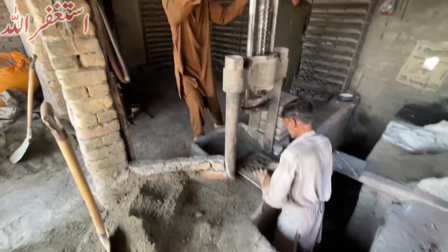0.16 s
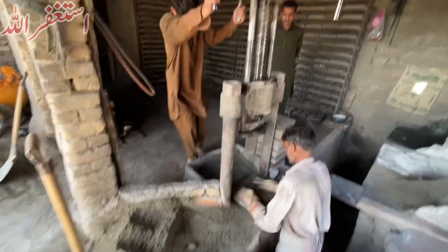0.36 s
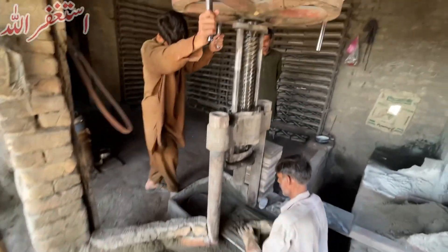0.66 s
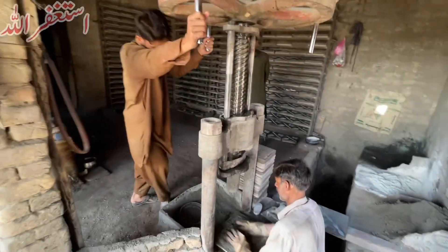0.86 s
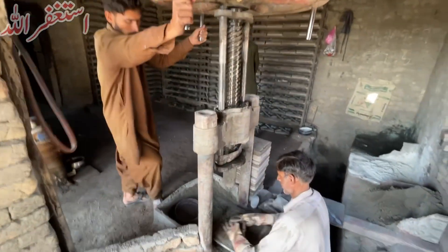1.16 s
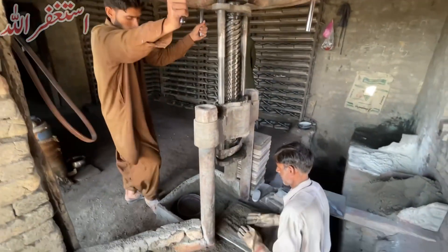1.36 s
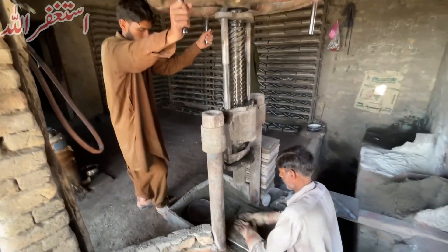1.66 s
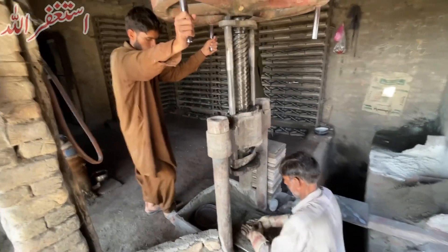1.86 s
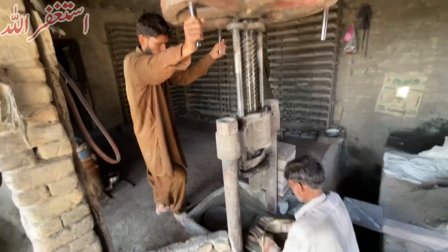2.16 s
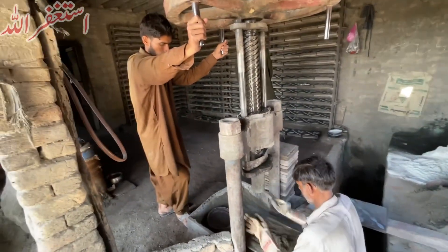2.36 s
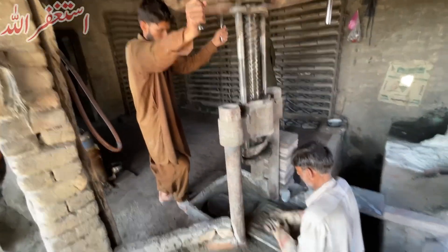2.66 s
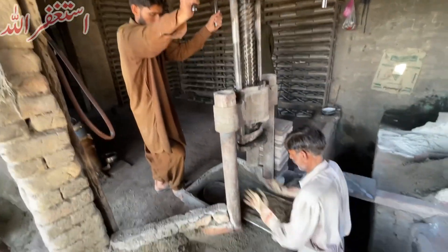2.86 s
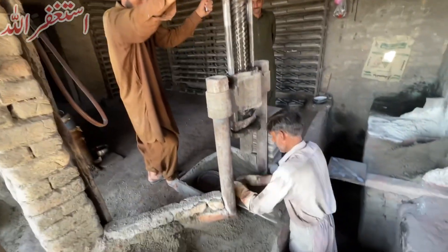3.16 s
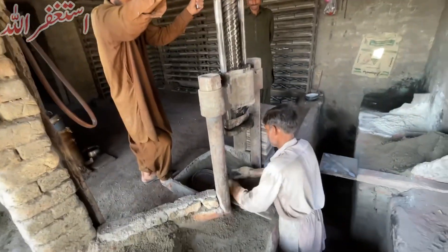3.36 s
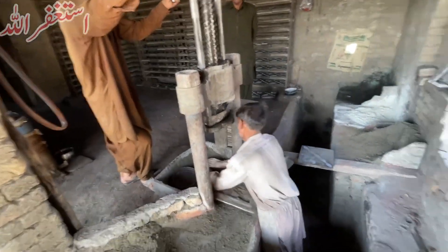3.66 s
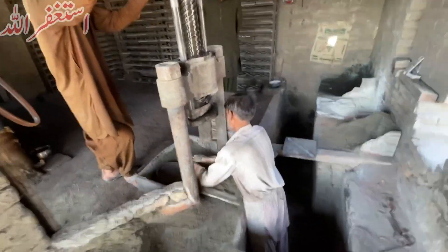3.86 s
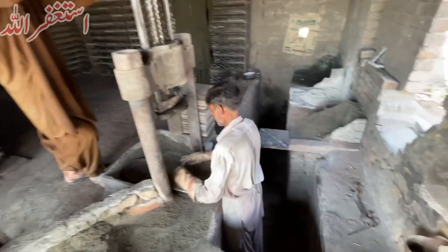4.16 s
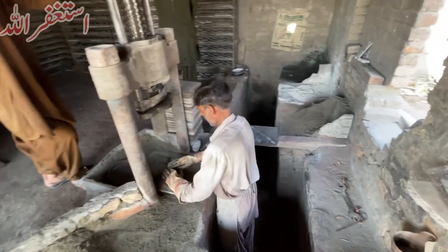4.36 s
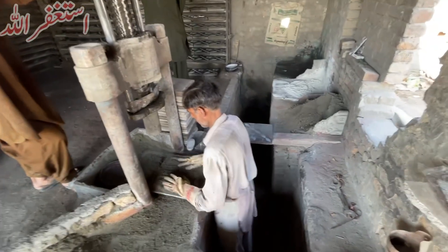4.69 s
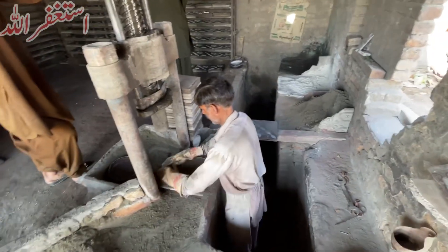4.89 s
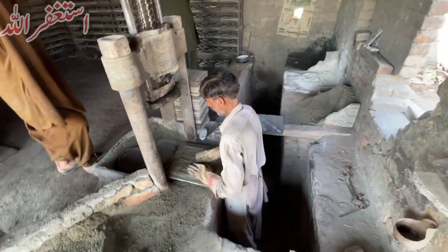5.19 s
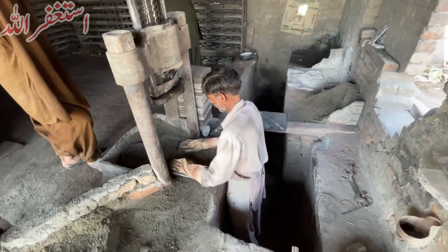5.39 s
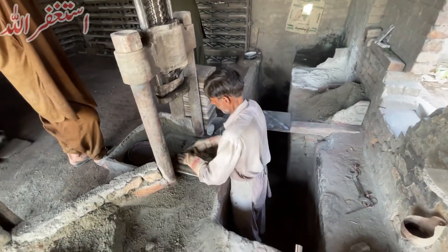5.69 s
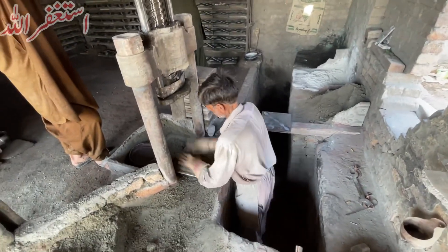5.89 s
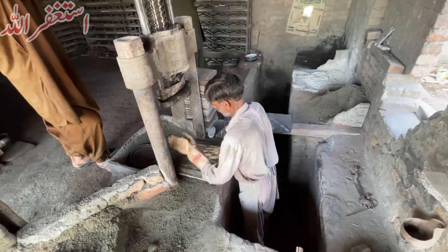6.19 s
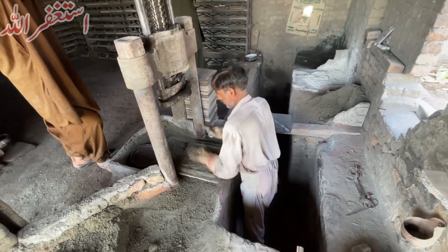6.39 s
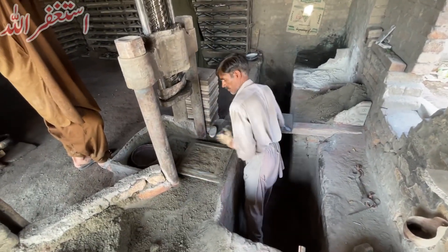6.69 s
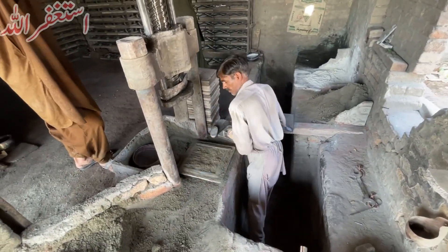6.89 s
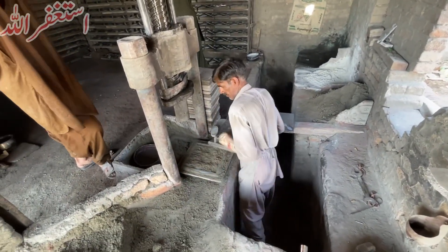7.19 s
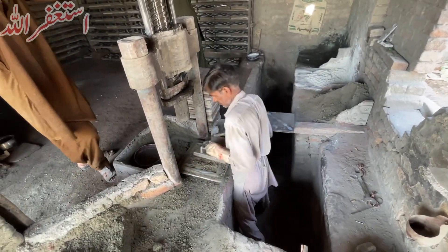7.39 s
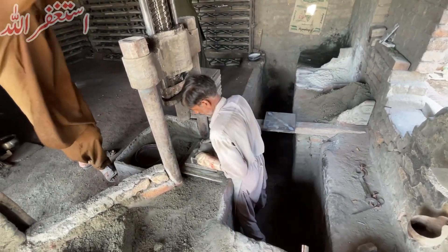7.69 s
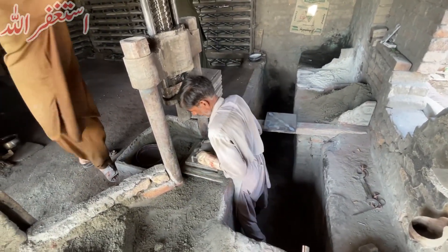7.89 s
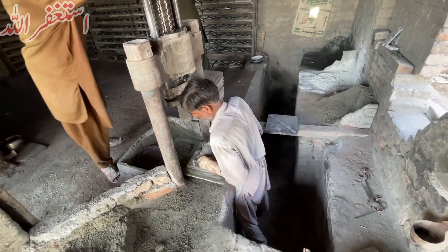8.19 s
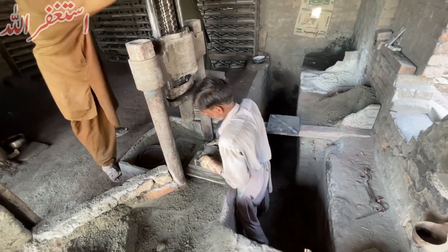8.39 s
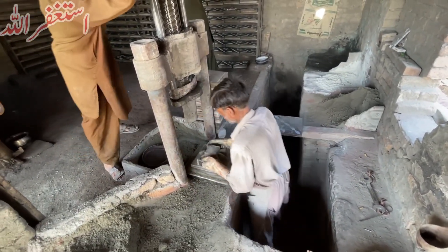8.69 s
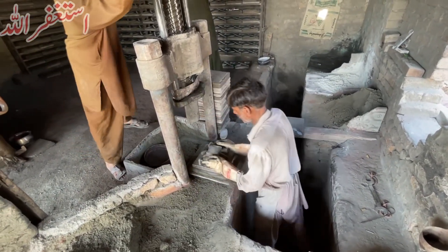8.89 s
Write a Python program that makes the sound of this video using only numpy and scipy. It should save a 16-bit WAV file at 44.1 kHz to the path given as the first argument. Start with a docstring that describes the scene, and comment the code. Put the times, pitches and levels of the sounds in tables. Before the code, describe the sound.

Steel mould knocks and scrapes over gritty cement on a press bed, then a loud clashing metal slam rings, and a last knock cuts off.

```python
"""Mould knocked about on a screw press

A tile maker knocks a steel mould about on the bed of a hand screw press in a small brick workshop.
Knocks are noise bursts and damped modes; between them the mould rubs over gritty cement (shaped noise).
Then it is shoved home and the press slams, rattles and rings: clashing steel over the frame's modes.
Rough bursts, brief tones, rumble and hiss fill in; a last knock follows before the sound stops dead."""
import sys
import numpy as np
from scipy import signal
from scipy.fft import rfft, irfft, next_fast_len
from scipy.io import wavfile
from scipy.ndimage import uniform_filter1d, map_coordinates

SR = 44100
rng = np.random.default_rng(int(sys.argv[2]) if len(sys.argv) > 2 else 0)


def wav_out(sig):
    """Save sig, one row per channel (or a flat mono array), as 16-bit PCM at SR to the path in sys.argv[1]."""
    wavfile.write(sys.argv[1], SR, np.round(np.clip(np.atleast_2d(sig).T, -1, 1) * 32767).astype(np.int16))


N = 399105

# spectrum of steel contact: (frequency [Hz], density [dB per Hz])
CLASH_COLOUR = [(88, -36), (150, 0), (534, -5), (821, -3), (1080, -4), (2450, -1.5), (2700, -2.5),
                (3290, -4.5), (4320, -9), (7180, -17), (9260, -21), (10400, -25.5), (16000, -34)]
# spectrum of low rumbling: (frequency [Hz], density [dB per Hz])
RUMBLE_COLOUR = [(20, -35.5), (40, -18.5), (70, -5.5), (100, -4), (125, 5.5), (155, -5), (195, -0.5),
                 (260, -9.5), (400, -15), (700, -20.5), (1500, -48.5)]
FLAT = [(100, 0)]


def amp(db):
    """Decibels to gain."""
    return 10 ** (np.asarray(db) / 20)


def unit(x):
    """Scale to rms 1."""
    return x / np.sqrt(np.mean(x ** 2) + 1e-20)


def along(points, hz):
    """Interpolate (frequency [Hz], value) points on a log-frequency axis."""
    f, v = np.transpose(points)
    return np.interp(np.log(hz + 1), np.log(f + 1), v)


def curves(rows):
    """One value per sample for each column after the time."""
    s, *cols = np.transpose(rows)
    return [np.interp(np.arange(N) / SR, s, c) for c in cols]


def wobble(knots_per_s):
    """Smooth random curve through normally distributed knots."""
    knots = rng.standard_normal(int(N * knots_per_s / SR) + 4)
    return map_coordinates(knots, [np.arange(N) * knots_per_s / SR])


def filtered(x, response):
    """Multiply the spectrum of x by a response of frequency."""
    size = x.shape[-1]
    m = next_fast_len(size + 2048)
    return irfft(rfft(x, m) * response(np.fft.rfftfreq(m, 1 / SR)), m)[..., :size]


def noise(colour, size, lo_hz=0, hi_hz=SR):
    """Coloured stereo noise of rms 1, alike in the bass and largely unrelated in the treble."""
    # left-right likeness: (frequency [Hz], correlation [0-1])
    alike = [(100, 0.94), (250, 0.85), (600, 0.22), (2000, 0.26), (5000, 0.22), (12000, .1)]

    def mid_side(hz):
        turn = np.arccos(np.clip(along(alike, hz), -1, 1)) / 2
        gain = amp(along(colour, hz)) * (hz >= lo_hz) * (hz < hi_hz)
        return gain * np.array([np.cos(turn), np.sin(turn)])

    mid, side = filtered(rng.standard_normal((2, size)), mid_side)
    return unit(np.array([mid + side, mid - side]))


def add(track, s, sound):
    """Mix a sound in at time s."""
    start = max(round(s * SR), 0)
    track[:, start:start + sound.shape[-1]] += sound[..., :N - start]


def burst(colour, band_hz, rise_s, t60_s):
    """Dense, fast-dying modes within one band, as decaying noise at rms 1 over the first 20 ms."""
    t = np.arange(SR // 2) / SR
    envelope = (1 - np.exp(-(t / rise_s) ** 2)) * amp(-60 * t / t60_s)
    x = noise(colour, len(t), *band_hz) * envelope
    return x / np.sqrt(np.mean(x[:, :SR // 50] ** 2))


def ring(modes, rise_s, scatter_db, spread_rad):
    """Decaying modes at randomly scattered strengths; spread sets their phase difference between ports."""
    hz, db, t60 = np.transpose(modes)
    t = np.arange(SR if t60.max() > .5 else SR // 2) / SR
    chance = rng.standard_normal((2, len(hz)))
    level_db = (db + scatter_db * chance[0])[:, None] - 60 * t / t60[:, None]
    waves = amp(level_db) * np.exp(2j * np.pi * hz[:, None] * t)
    ports = np.exp(1j * spread_rad * np.outer([1, -1], chance[1]))
    return (ports @ waves).imag * (1 - np.exp(-t / rise_s))


def tilted(modes, db_per_octave):
    """The place of a blow favours an object's upper or lower modes."""
    hz, db, t60 = np.transpose(modes)
    return np.transpose([hz, db + db_per_octave * np.log2(hz / hz[0]), t60])


def gripped(modes):
    """The modes of a loose part, each detuned a little by the way it is held at this contact."""
    hz, db, t60 = np.transpose(modes)
    shift = .012 * rng.standard_normal(len(hz))
    return np.transpose([hz * (1 + shift), db, t60])


def focused(colour, hz):
    """The part that is hit colours the contact: a broad hump around its frequency."""
    focus_db, focus_octaves = 6.5, 0.62
    f = np.geomspace(60, SR / 2, 80)
    hump = np.exp(-(np.log2(f / hz) / focus_octaves) ** 2)
    return np.transpose([f, along(colour, f) + focus_db * hump])


def bent(x):
    """A blow after it has crossed the bed as a bending wave: the low notes arrive last."""
    lag_s, lag_at_hz = 0.004486, 250  # lag grows as 1 / sqrt(frequency)
    return filtered(x, lambda hz: np.exp(-4j * np.pi * lag_s * np.sqrt(lag_at_hz * hz)))


def room(x, wet_db, build_s=0.0023):
    """A sound plus the answer of the brick walls: a noise tail whose decay time depends on frequency."""
    # wall reverberation: (frequency [Hz], t60 [s])
    walls = [(100, 0.49), (250, 0.48), (600, 0.3), (1500, 0.25), (4000, 0.15), (12000, 0.18)]
    hz, t, z = signal.stft(noise(FLAT, SR // 2), SR, nperseg=256)
    decay = amp(-60 * t / along(walls, hz)[:, None]) * (1 - np.exp(-t / build_s))
    tail = signal.istft(z * decay, SR, nperseg=256)[1]
    wet = signal.fftconvolve(x, tail / np.linalg.norm(tail[0]), axes=1)[:, :x.shape[1]]
    return x + amp(wet_db) * wet


def knocks():
    """Steel cracks and rings in two damped modes; the weight thumps the bed and booms in the pit."""
    # knocks of the filled mould: (time [s], strength [dB], contact hardness [dB], weight behind it [dB],
    # thump [Hz], clack [dB], thud [dB], lower mode [Hz], its level [dB], upper mode [Hz], its level [dB],
    # tilt of the bed's modes [dB per octave])
    knock_rows = [(0.536, -53.5, -2.5, 10.5, 416, -4.5, 2, 1100, 0, 2570, 6, 1),
                  (.845, -51.5, 0, 1.5, 274, -1.5, 1.5, 1110, 11.5, 2570, 1.5, -1),
                  (0.998, -23, 11.5, 10.5, 258, 2, -5, 966, 1.5, 2170, 10.5, -8),
                  (1.269, -29, 8.5, 12.5, 235, 0.5, 0.5, 1104, 9, 1650, 9, -6),
                  (1.372, -25.5, 8, 0, 201, 0.5, -2, 2450, 4, 3400, 5, 4),
                  (1.686, -25, 8, 8.5, 226, -0.5, 1.5, 1135, -3, 1960, 13, -1),
                  (2.514, -55, 5, -8, 300, 2, -1, 1090, 0, 2440, 21, 0),
                  (3.720, -19, 7, 0, 191, 0, 3, 900, 5.5, 1214, 10, -4),
                  (3.834, -34.5, 4, 7, 346, -0.5, 5, 2600, 12, 3290, 6.5, -7),
                  (3.926, -37, 2.5, 6, 213, -3.5, -2.5, 1360, 11.5, 2500, 8.5, 3),
                  (4.077, -22.5, 8.5, 11, 234, -9.5, 4.5, 1914, 5, 1640, 11.5, 3),
                  (4.983, -41.5, -1, -4, 475, 0, -2, 840, 20.5, 2300, 11, 0),
                  (5.254, -21, 7, 0.5, 193, -0.5, -16, 1373, 12.5, 3150, 13, -5.5),
                  (5.458, -32.5, -15, 16, 207, -8, -0.5, 620, 3, 1030, 15, -0.5),
                  (5.657, -32, 4, 5.5, 200, -1, -2.5, 690, 13, 2730, 14, -4),
                  (5.829, -42, 4, 5.5, 313, -7, 1, 1140, -1, 2220, 6, 0),
                  (6.28, -51, 2.5, -19, 300, -6, -4, 885, 10, 1700, 21, 0),
                  (6.835, -54, 0, -12, 300, -12, -3, 935, 14, 2900, 8, 0),
                  (8.635, -23, 0.5, 6.5, 409, -1.5, 3.5, 426, 8, 1590, 4, 3.5)]
    # work pit under the press: (frequency [Hz], level [dB], t60 [s])
    pit_modes = [(91.4, 1.5, 0.26), (103.6, -4, 0.3), (136, -8.5, 0.13)]
    # bed under the mould: (frequency [Hz], level [dB], t60 [s])
    bed_modes = [(215.7, -14.5, 0.41), (247.5, -16.5, 0.33), (283.1, -17.5, 0.31), (402.4, -18, 0.29),
                 (472, -26, 0.35), (528, -28, 0.14)]
    # spectrum of the contact: (frequency [Hz], density [dB per Hz])
    colour = [(180, -29), (300, -0.5), (725, -1.5), (1140, -11), (1480, -12.5), (2140, -13.5), (3190, -16),
              (4670, -25.5), (6100, -27.5), (6740, -34), (8790, -28), (12300, -40.5), (16000, -44)]
    crack_part_db, grit_part_db, thump_part_db, boom_part_db = -4, -16.5, 7, -3.5
    thud_part_db, settle_part_db, lead_in_part_db = -9, -13, -19.5
    settle_s, lead_in_s = .006, 0.0045
    boom_grows = 0.6  # dB of boom per dB by which weight exceeds hardness
    room_db, room_falls = -0.5, 0.56  # walls' share, and its loss per dB of hardness
    firm_db, light_room = -24.5, 0.14  # dB more of the walls per dB a knock is lighter than firm
    low_hz, middle_hz, high_hz = (330, 1000), (1000, 4000), (4000, SR)
    out = np.zeros((2, N))
    for (s, db, hardness_db, weight_db, thump_hz, clack_db, thud_db,
         lower_hz, lower_db, upper_hz, upper_db, tilt_db) in knock_rows:
        clack = amp(clack_db) * burst(colour, low_hz, rise_s=0.002, t60_s=0.045)
        crack = amp(crack_part_db) * burst(colour, middle_hz, rise_s=0.0046, t60_s=0.027)
        grit = amp(grit_part_db) * burst(colour, high_hz, rise_s=0.0058, t60_s=0.016)
        contact = clack + amp(hardness_db) * (crack + grit)
        # the mould's far edge lands a moment later
        edge = burst(CLASH_COLOUR, (900, SR), rise_s=0.00072, t60_s=0.036)
        contact = contact + amp(hardness_db + settle_part_db) * np.roll(edge, int(settle_s * SR), axis=1)
        wet_db = room_db - room_falls * hardness_db + light_room * (firm_db - db)
        add(out, s - .001, amp(db) * room(contact, wet_db))

        # soft noise swelling in just before each knock
        lead_in = burst(CLASH_COLOUR, (600, SR), rise_s=.004, t60_s=0.022)
        add(out, s - lead_in_s, amp(db + hardness_db + lead_in_part_db) * lead_in)

        pair = [(lower_hz, lower_db, .036), (upper_hz, upper_db, .03)]
        modes = ring(pair, rise_s=0.0026, scatter_db=-2, spread_rad=0.079)
        add(out, s - .001, amp(db + hardness_db + crack_part_db) * room(modes, wet_db=-7.5))

        thump = ring([(thump_hz, 1, .06)], rise_s=0.0016, scatter_db=-0.5, spread_rad=0.085)
        # the bed takes up the blow more slowly
        bed = ring(tilted(bed_modes, tilt_db), rise_s=0.0022, scatter_db=3.0, spread_rad=0.27)
        add(out, s, amp(db + weight_db + thump_part_db) * bent(thump + bed))

        # dull thud of the cement
        thud = room(burst(FLAT, (170, 560), rise_s=0.00092, t60_s=0.1), wet_db=-2.5)
        add(out, s, amp(db + thud_part_db + thud_db + weight_db / 2) * bent(thud))

        boom_db = db + boom_part_db + boom_grows * (weight_db - hardness_db)
        boom = ring(pit_modes, rise_s=0.014, scatter_db=2.0, spread_rad=.1)
        add(out, s, amp(boom_db) * bent(boom))
    return out


def press():
    """Loose steel parts clash, each with its own clank, while the frame booms and rings under the blow."""
    # steel striking steel: (time [s], strength [dB], brightness [dB], body [dB], contact t60 [s],
    # clank [Hz], clank level [dB])
    clashes = [(7.272, -37, -4, -6, 0.069, 1200, -1), (7.741, -21.5, -10, 9.5, 0.087, 546, 8),
               (7.756, -15.5, -2.5, -1.5, 0.029, 2090, 0.5), (7.768, -22, 8, 0.5, 0.052, 3220, 3),
               (7.827, -23, -6, 6.5, 0.04, 457, 3), (7.87, -11.5, -16, -1.5, 0.049, 1670, 5),
               (7.888, -19.5, 7, -6.5, 0.076, 1140, 13), (7.923, -26, 5, -9, 0.065, 1530, 13),
               (7.959, -22.5, 6, -4.5, 0.061, 1140, 0), (7.973, -18, 5.5, -9.5, 0.045, 1720, 0),
               (8.023, -18, -1.5, -2.5, 0.13, 1310, -12), (8.083, -26, -7.5, 0.5, 0.083, 2060, -11),
               (8.115, -28.5, -1, -1.5, 0.051, 1716, 10), (8.138, -16.5, -6.5, -22, 0.15, 1800, -17),
               (8.241, -33, -8, -5, 0.18, 2430, 2), (8.312, -35, 0, -1.5, 0.14, 1790, 7.5),
               (8.537, -33, -4, -4, 0.05, 2410, -3)]
    # jolts of the heavy frame: (time [s], boom [dB], lasting ring [dB],
    # share of the ring time left by a gripping hand [0-1], tilt of the ring [dB per octave])
    jolts = [(7.275, -52, -48.5, 0.27, 4), (7.881, -16.5, -37.5, 0.8, 0), (8.138, -45, -41.5, .85, 0),
             (8.578, -40, -59.5, 0.32, 0)]
    # heavy frame: (frequency [Hz], level [dB], t60 [s])
    frame_modes = [(52.4, -22, 2.2), (70.1, -16, 1.1), (86, -9, .9), (95, -1.5, 1.3), (109, -5, .85),
                   (124, -2, .95), (142, -10, .6), (160, -11, .4), (185, -5, .25), (224, -3, .2),
                   (312, -27, 1.5), (405, -21, .9), (446, -15, .45)]
    # loose steel parts: (frequency [Hz], level [dB], t60 [s])
    steel_modes = [(1198, -0.5, 0.12), (1268, -6.5, 0.37), (1384, -2.5, 0.077), (1810, -2, 0.12),
                   (1755, -5, 0.49), (2130, -9, 0.2), (2500, -9.5, 0.13), (2970, -11, 0.16)]
    # their high, bright modes: (frequency [Hz], level [dB], t60 [s])
    bright_modes = [(3270, 4, 0.16), (3240, 4, 0.091), (3460, -7, .14), (3600, -8.5, 0.23),
                    (4250, -10.5, .14), (4560, -6.5, 0.2), (5870, -8.5, 0.14), (6540, -8.5, .1),
                    (7300, -12, 0.089), (7800, -6.5, .11), (8460, -3, 0.089), (8800, 0.5, 0.087),
                    (9000, -2, 0.19), (9950, -6, 0.09)]
    # lasting ring of the press: (frequency [Hz], level [dB], t60 [s])
    press_ring = [(1062, -2.5, 2.7), (1150, 3.5, .45), (1260, 4, .45), (1357, -3.5, 2.8), (1378, -4, .8),
                  (1744, 1.5, 0.48), (1780, -2.5, .45), (2003, -5.5, .7), (2153, -1.5, .9), (2200, 1, .8),
                  (2440, 2.5, 1.4), (2643, -6, 0.63), (2900, -9, 0.86), (2960, -2, 0.84), (3700, -9.5, .55),
                  (4330, -5, .4)]
    low_part_db, mid_part_db, high_part_db = -9.5, -5, -14.5  # contact noise, against the strength
    steel_part_db, bright_part_db = -9.5, -13.5  # ringing parts, against the strength
    low_hz, middle_hz, high_hz = (180, 1000), (1000, 4000), (4000, SR)
    clank_t60_s, grip_scatter_db = 0.056, 3.5
    shudder_db, shudder_per_s = 2.5, 29  # the frame's boom wavers as the loose parts shift
    out = np.zeros((2, N))
    for s, db, brightness_db, body_db, t60_s, hz, clank_db in clashes:
        colour = focused(CLASH_COLOUR, hz)
        clack = amp(low_part_db + body_db) * burst(colour, low_hz, rise_s=0.00029, t60_s=t60_s)
        crack = amp(mid_part_db) * burst(colour, middle_hz, rise_s=0.0012, t60_s=t60_s)
        grit = amp(high_part_db + brightness_db) * burst(colour, high_hz, rise_s=0.0035, t60_s=t60_s)
        add(out, s, amp(db) * room(clack + crack + grit, wet_db=-0.5))
        clank = ring([(hz, 0, clank_t60_s)], rise_s=0.00076, scatter_db=-2, spread_rad=0.44)
        add(out, s, amp(db + clank_db) * clank)
        steel = ring(gripped(steel_modes), rise_s=.001, scatter_db=grip_scatter_db, spread_rad=.7)
        bright = ring(gripped(bright_modes), rise_s=.001, scatter_db=grip_scatter_db, spread_rad=.7)
        add(out, s, amp(db + steel_part_db) * steel)
        add(out, s, amp(db + bright_part_db + brightness_db) * bright)
    for s, boom_db, ring_db, free, tilt_db in jolts:
        boom = ring(frame_modes, rise_s=0.0031, scatter_db=3, spread_rad=0.13)
        shudder = amp(shudder_db * wobble(shudder_per_s))[:boom.shape[1]]
        add(out, s, amp(boom_db) * room(boom * shudder, wet_db=-18.0))
        rumble = burst(RUMBLE_COLOUR, (60, 700), rise_s=0.011, t60_s=0.62)
        add(out, s, amp(boom_db - 4.5) * rumble)
        held_modes = tilted(press_ring, tilt_db) * [1, 1, free]
        add(out, s, amp(ring_db) * ring(held_modes, rise_s=0.0011, scatter_db=1, spread_rad=0.6))
    return out


def patchy(x):
    """A grating band wanders up and down, while narrow regions swell and fade within hundredths of a second."""
    patch_db = 2
    band_hz, band_db, band_octaves = 2300, 6.5, 0.24  # the dragged edge grates here
    swing_octaves, moves_per_s = .26, 14  # the contact travels along the edge
    hz, t, z = signal.stft(x, SR, nperseg=512)
    field = uniform_filter1d(rng.standard_normal(z.shape[1:]), size=4, axis=0)
    field = uniform_filter1d(field, size=7, axis=1)
    centre = swing_octaves * np.interp(t * SR, np.arange(N), wobble(moves_per_s))
    octaves_off = np.log2((hz[:, None] + 1) / band_hz) - centre
    band = np.exp(-(octaves_off / band_octaves) ** 2)
    gain = amp(patch_db * unit(field) + band_db * band)
    return unit(signal.istft(z * gain, nperseg=512)[1][:, :N])


def plate_singing():
    """Friction noise stirs the mould plate's resonances, at a pitch that wanders as the contact moves."""
    # mould plate: (frequency [Hz], width [Hz], level [dB])
    plate_modes = [(1030, 60, -11.5), (1390, 69, 0.5), (1740, 92, 7), (2516, 210, 8.5), (3080, 200, 2.5)]
    shift_db = 4 * wobble(12)  # low and high modes take turns
    wander, wander_per_s = .018, 20
    friction = noise(FLAT, N)

    def plate(modes):
        return filtered(friction, lambda f: sum(amp(db) / (1 + 2j * (f - hz) / width)
                                                for hz, width, db in modes))

    singing = amp(shift_db) * plate(plate_modes[:3]) + amp(-shift_db) * plate(plate_modes[3:])
    clock = np.cumsum(1 + wander * wobble(wander_per_s)) % N
    return unit(np.array([np.interp(clock, np.arange(N), port) for port in singing]))


def sliding():
    """Strokes drag the mould over cement: plate sings, coarse grains crunch, loose sand hisses and damps."""
    # strokes on the bed: (start [s], length [s], force [dB], sandiness [dB], hollowness [dB])
    strokes = [(0, 0.26, -50.5, -6, 2.5), (0.25, 0.24, -52, -6.5, 2.5), (0.476, 0.28, -50, -8.5, 0),
               (0.878, 0.04, -54.5, -15.5, -6.5), (1.144, 0.27, -56, -12.5, 3),
               (1.888, 0.42, -46.5, -6.5, -1.5), (2.28, 0.13, -58, -6, 7), (2.451, 0.35, -52.5, -7.5, 5),
               (2.796, 0.2, -49, -6, 4), (2.989, 0.2, -51, -6, 6), (3.185, 0.29, -49.5, -8, 1),
               (3.537, 0.85, -56.5, -1.5, 3), (4.327, 0.086, -52, -11.5, -13), (4.418, 0.15, -55, 4.5, 9.5),
               (4.647, 0.088, -56.5, 3, 9), (4.79, 0.61, -64.5, 7, 3), (5.345, 0.46, -52, 1, 5.5),
               (6.109, 0.28, -50, -17, -21), (6.429, 0.13, -53, -3.5, 2), (6.66, 0.38, -45.5, -9, -4),
               (6.915, 0.2, -42, -8.5, -5), (7.391, 0.093, -45.5, -7, -0.5), (8.479, 0.31, -44.5, -6, 0)]
    # spectrum of the rubbing: (frequency [Hz], density [dB per Hz])
    rub_colour = [(240, -40), (400, -10.5), (787, -8.5), (1040, -1), (1710, -3.5), (1940, -4), (2490, -4),
                  (4220, -10.5), (8000, -20), (10400, -51.5), (17600, -120)]
    # spectrum of loose sand: (frequency [Hz], density [dB per Hz])
    sand_colour = [(1500, -11.5), (4000, 0.5), (6500, -5), (9000, -1), (12000, -8.5), (15500, -13.5)]
    swell = 0.65  # loudness follows the hand's speed to this power
    plate_db, sand_damps = -10, 0.81  # the plate's singing, and its loss per dB of sandiness
    grains_per_s, grain_spread_db, grain_db = 170, 5.5, -9
    hollow_below_hz = 1400
    rub, hollow, sing, sand = layers = np.zeros((4, N))
    for start, length, db, sand_db, hollow_db in strokes:
        progress = np.linspace(0, 1, int(length * SR))
        speed = 4 * progress * (1 - progress)
        gains = amp([0, hollow_db, plate_db - sand_damps * sand_db, sand_db])
        add(layers, start, np.outer(gains, amp(db) * speed ** swell))

    singing = plate_singing()
    strength_db = grain_spread_db * np.clip(rng.standard_normal(N), -2, 2)
    crushes = (rng.random(N) < grains_per_s / SR) * amp(strength_db)
    crushes = crushes * (1 + .5 * rng.standard_normal((2, N)))  # uneven between the ports
    crunch = unit(filtered(crushes, lambda f: amp(along(rub_colour, f))))
    rubbing = patchy(noise(rub_colour, N) + amp(grain_db) * crunch)
    low = filtered(rubbing, lambda f: 1 / (1 + (f / hollow_below_hz) ** 8))
    body = hollow * low + rub * (rubbing - low) + sing * singing

    catching = amp(0.47 * wobble(21) + 1.5 * wobble(60))
    roughness = unit(amp(1.9 * wobble(700)))
    return room(catching * roughness * (body + sand * noise(sand_colour, N)), wet_db=-5.0)


def rough_bursts():
    """Rough, short bursts of noise among the scrapes and clashes, and the odd snapping sand grain."""
    # rough bursts: (time [s], length [s], level [dB])
    burst_rows = [(5.823, 0.052, -35.5), (6.645, 0.012, -44), (7.403, 0.016, -46), (7.972, 0.019, -23.5),
                  (8.139, 0.035, -29), (8.554, .03, -48.5)]
    # sand grains snapping under the steel: (time [s], level [dB])
    ticks = [(1.83, -66), (2.125, -47.5), (2.36, -64), (2.451, -65), (5.062, -49.5), (5.21, -46),
             (7.198, -59)]
    out = np.zeros((2, N))
    for s, length, db in burst_rows:
        size = int(length * SR)
        roughness_db = 4.2 * unit(uniform_filter1d(rng.standard_normal(size), size=40))
        envelope = amp(roughness_db) * signal.windows.tukey(size, .3)
        add(out, s, amp(db) * unit(noise(CLASH_COLOUR, size) * envelope))
    for s, db in ticks:
        add(out, s, amp(db) * burst(FLAT, (2000, SR), rise_s=.0003, t60_s=0.015))
    return room(out, wet_db=-4.5)


def whistles():
    """Brief, unsteady steel tones, most of them struck up by the slam: sines of wavering pitch and level."""
    # whistling steel: (time [s], length [s], frequency [Hz], level [dB])
    whistle_rows = [(3.942, .03, 2550, -45), (4.47, .12, 2753, -57), (7.76, .046, 6200, -39),
                    (7.885, .03, 3226, -25), (7.885, .04, 4617, -29), (7.888, .04, 5894, -37),
                    (7.875, .14, 13420, -38), (7.88, .1, 14200, -49), (7.97, .12, 13330, -53),
                    (7.965, .075, 12750, -45), (7.97, .026, 7685, -35)]
    out = np.zeros((2, N))
    pitch_waver = 1 + .004 * wobble(150)
    level_waver = amp(5.2 * wobble(80))
    for s, length, hz, db in whistle_rows:
        now = round(s * SR) + np.arange(int(length * SR))
        phase = 2 * np.pi * np.cumsum(hz * pitch_waver[now]) / SR
        tone = np.sin(phase) * level_waver[now]
        add(out, s, amp(db) * unit(tone * signal.windows.tukey(len(now), .6)))
    return room(out, wet_db=-5.0)


def background():
    """The workshop's wavering low rumble and faint, steady hiss, both coloured noise."""
    # workshop rumble: (time [s], level [dB])
    rumble_rows = [(0, -46), (3.3, -48.5), (7.5, -49)]
    # spectrum of the hiss: (frequency [Hz], density [dB per Hz])
    hiss_colour = [(300, -7.5), (600, 5.5), (2500, 4.5), (6000, -3), (9000, -5), (12000, -10.5),
                   (15500, -22.5)]
    hiss_db = -59
    rumble_db, = curves(rumble_rows)
    rumble = amp(rumble_db + 1.8 * wobble(14)) * noise(RUMBLE_COLOUR, N)
    return rumble + amp(hiss_db) * noise(hiss_colour, N)


def scene():
    """All sources, with level differences between the ports by frequency; the left port hears first."""
    # balance of the ports: (frequency [Hz], left minus right [dB])
    lean = [(100, 2), (500, 4), (1200, 2), (2600, -1.5), (5000, 2), (8500, 9), (14000, 4)]
    left_lead_s = .00006

    def ports(hz):
        level = amp(np.outer([.5, -.5], along(lean, hz)))
        return level * np.exp(1j * np.pi * np.outer([1, -1], hz) * left_lead_s)

    return filtered(knocks() + press() + sliding() + rough_bursts() + whistles() + background(), ports)


def record(dry):
    """The microphone sheds the deepest bass and rounds the peaks; the sound stops dead, cut above top_hz."""
    stop_s, top_hz = 8.799, 16000
    x = signal.sosfilt(signal.butter(2, 42, "highpass", fs=SR, output="sos"), dry)
    x = x / (1 + np.abs(x / .95) ** 6) ** (1 / 6)
    return filtered(x * (np.arange(N) / SR < stop_s), lambda hz: hz < top_hz)


dry = scene()
out = record(dry)
wav_out(out)
```